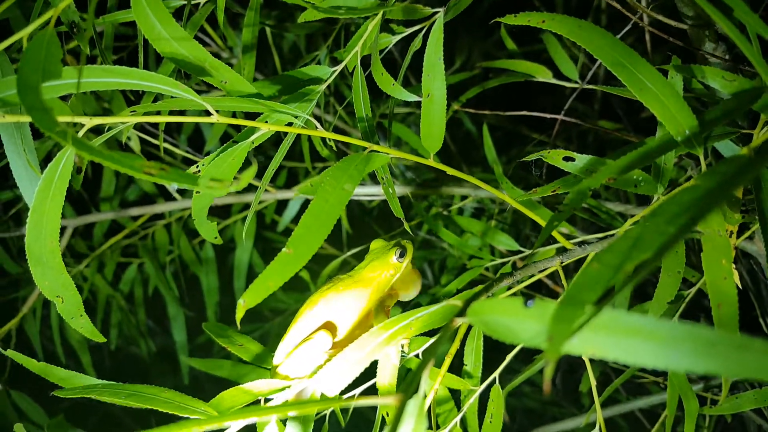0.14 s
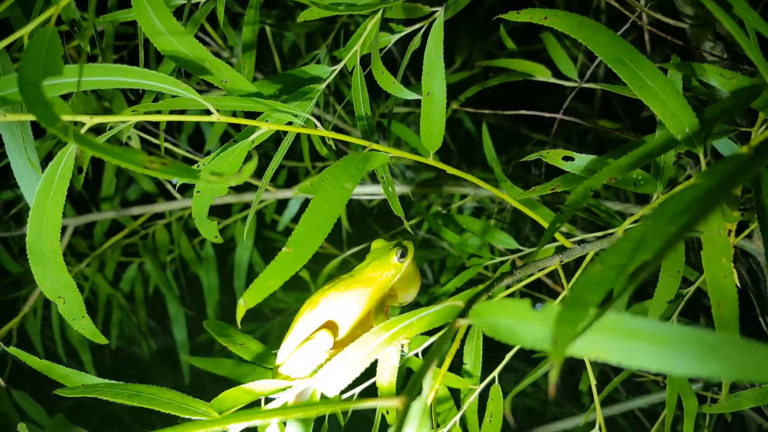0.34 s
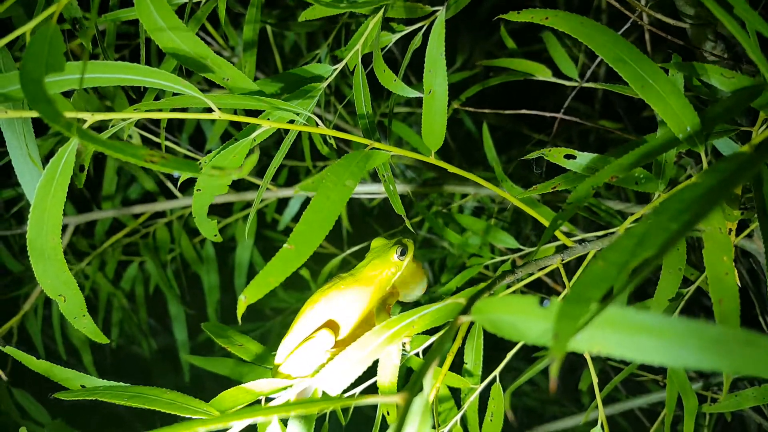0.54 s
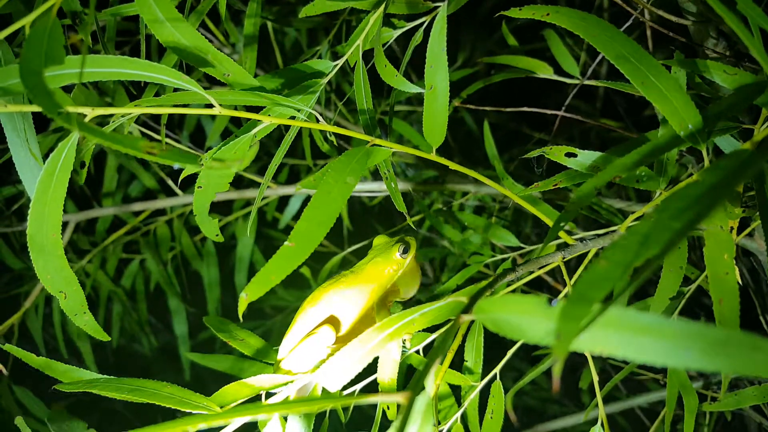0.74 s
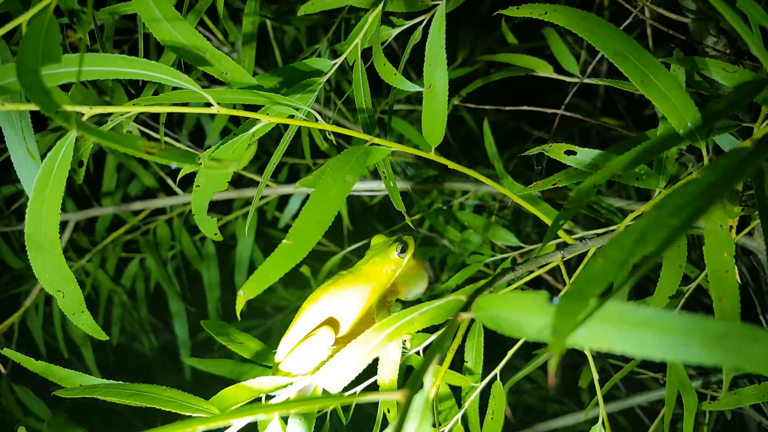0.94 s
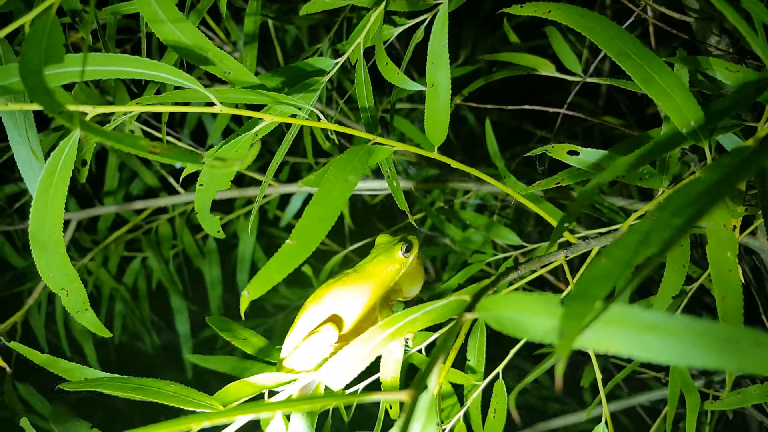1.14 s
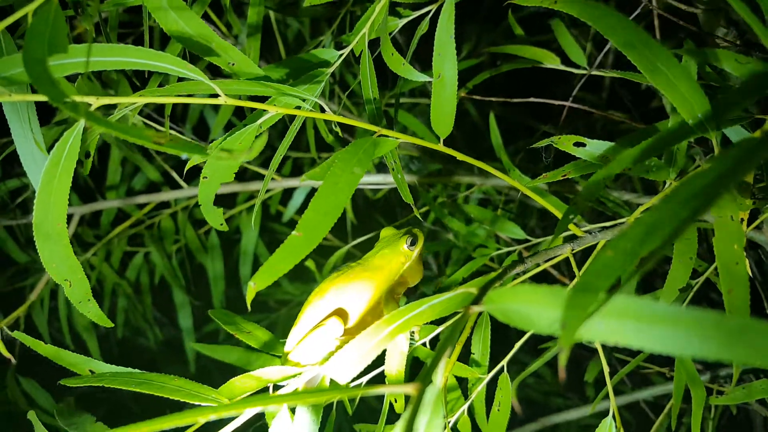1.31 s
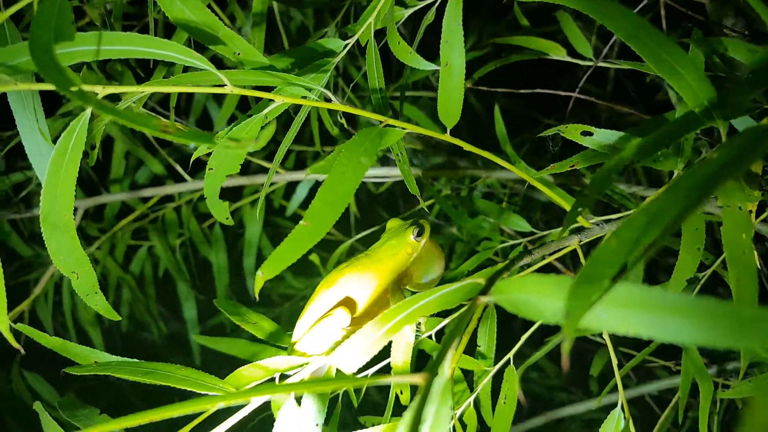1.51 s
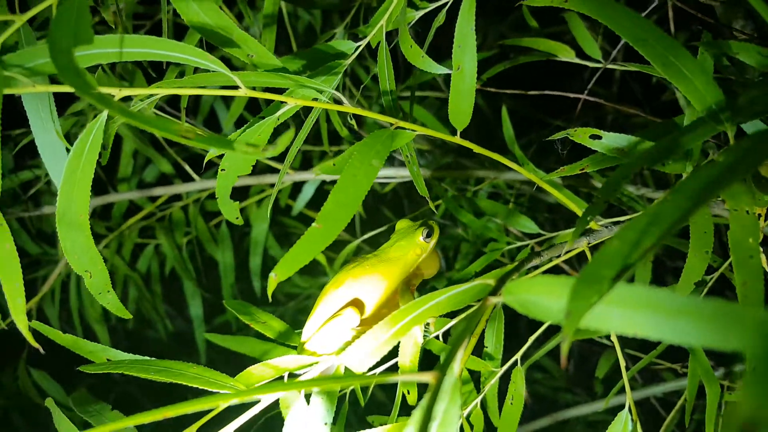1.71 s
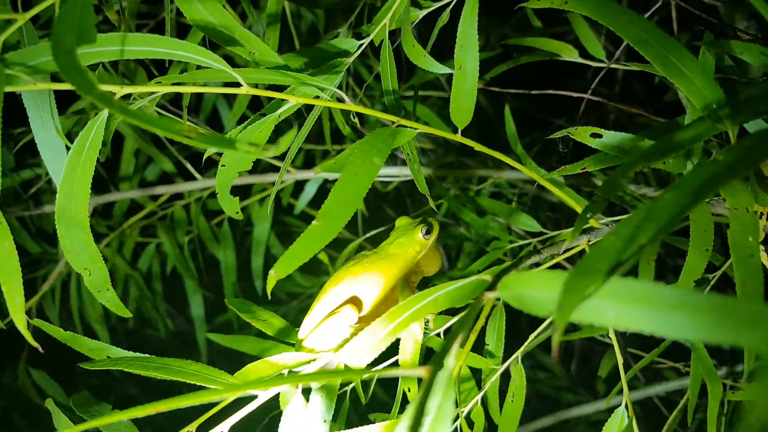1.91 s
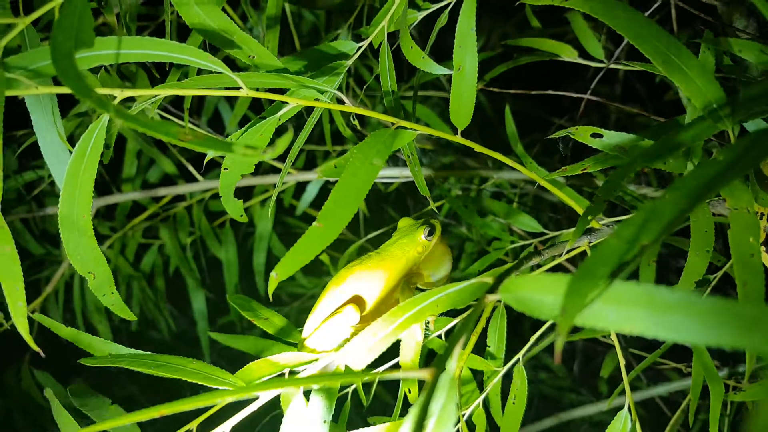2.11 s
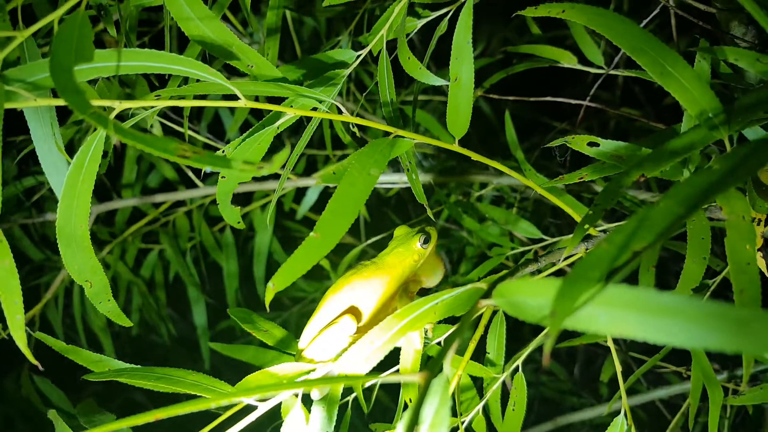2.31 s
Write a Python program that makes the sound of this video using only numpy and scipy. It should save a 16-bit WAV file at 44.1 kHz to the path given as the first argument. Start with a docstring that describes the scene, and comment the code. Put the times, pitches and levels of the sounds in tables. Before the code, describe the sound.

Five raspy, ratcheting tree frog croaks at close range, with distant frogs and insects faint behind

```python
"""A far frog sounds over a night chorus, then a tree frog croaks five times close by. Its vocal folds slap on
whole cycles of the sac's hum: slowly at first, then every second or third cycle, at last evenly every third.
Each slap rings the throat (decaying sines) and lets out a rasp of air (noise); each croak ends in a sagging hum.
Far frogs, made the same way, answer through scattering leaves; there is one dry click, insects chirp as pulsed
noise, and flickering noise bands make the insect and frog chorus and the low night rumble."""
import sys
import numpy as np
from scipy import signal
from scipy.fft import rfft, irfft
from scipy.io import wavfile

SR = 44100
rng = np.random.default_rng(int(sys.argv[2]) if len(sys.argv) > 2 else 0)


def level_to_linear(level):
    """Convert decibel levels to linear amplitude factors, elementwise."""
    exponent = np.asarray(level, float) / 20
    return 10 ** exponent


def digitize_waveform(pressure):
    """Quantize a signal to 16-bit integers and store it at the path in sys.argv[1].

    Rows of a 2-D input are taken as channels; values are limited to [-1, 1].
    """
    field = np.atleast_2d(pressure).T
    bounded = np.clip(field, -1, 1)
    quanta = np.round(bounded * 32767).astype(np.int16)
    wavfile.write(sys.argv[1], SR, quanta)


N = 103635  # length [samples]

# Close croaks: (start [s], slaps quick [s], slaps even [s], last slap [s], level [dB])
NEAR_CROAKS = [(0.2162, 0.246, .288, .3155, -7.5), (0.6066, 0.64, .6864, .7071, -7.5),
               (1.0047, 1.045, 1.0856, 1.1098, -7.5), (1.4127, 1.447, 1.4913, 1.5154, -8),
               (2.0008, 2.023, 2.0652, 2.079, -8)]
# Colour of the air rasp: (frequency [Hz], relative density [dB per Hz])
RASP_COLOUR = [(500, -38), (1000, -7), (1700, -4.5), (2600, 1.5), (3600, -12.5), (5000, -15.5),
               (6700, -11.5), (7600, -27), (11000, -43.5), (14000, -33.5), (16000, -47)]
# Mouth colour of the near frog's voice: (frequency [Hz], gain [dB])
MOUTH_COLOUR = [(500, 0.5), (1000, 2), (1600, 1.5), (2600, -1), (4000, 0), (7000, -0.5), (8000, -13.5),
                (11000, -17.5), (13000, -1.5), (16000, -5)]
# Balance of the near frog: (frequency [Hz], left over right [dB])
FROG_BALANCE = [(500, 6), (900, 8.5), (1400, 13), (2600, 8), (4400, 8), (6500, 23), (9000, 28),
                (14000, -2.5)]
# Phase between the microphones: (frequency [Hz], lead of the left [radians])
FROG_PHASE_LEAD = [(400, 2.1), (900, 1.285), (2670, 1.23), (4400, 2.1), (6500, 6.8), (14000, 28)]
BREATH_DB, LOW_CUT_HZ = -11, 690
LEAVES_DB, LEAVES_T60_S = -16.5, 0.057  # scatter off the nearby leaves


def near_frog():
    """Five croaks with a little rasp, reaching the two microphones unequally in level and phase."""
    voice, breath = np.sum([croak(*row) for row in NEAR_CROAKS], axis=0)
    rasp = coloured(breath * rng.standard_normal(N), RASP_COLOUR)
    voice = coloured(voice + level_to_linear(BREATH_DB) * rasp, MOUTH_COLOUR)
    low_cut = signal.butter(4, LOW_CUT_HZ, "high", fs=SR, output="sos")
    voice = signal.sosfilt(low_cut, voice)
    voice = voice + level_to_linear(LEAVES_DB) * scatter(voice, LEAVES_T60_S, channels=1)[0]
    hz = np.fft.rfftfreq(N, 1 / SR)
    path = level_to_linear(-at_hz(FROG_BALANCE, hz)) * np.exp(-1j * at_hz(FROG_PHASE_LEAD, hz))
    right = irfft(rfft(voice) * path, N)
    return np.array([voice, right])


# Slap strength through a croak: (time after start [s], level [dB])
SLAP_SWELL = [(0, -23), (.007, -5.5), (.014, 5), (.022, 5), (.032, 5)]
SAG_DB, EARLY_LOSS_DB = -4.5, -0.5  # fall from even to last slap; loss of a slap that comes early
CALM_DB = -9  # even slaps are steadier and carry less rasp
HUM_DB, HUM_FADE_DB = -18.5, -7


def croak(start, quick, even, last, db, tune=1.0, dull_db=0):
    """Hum, slaps locked to its cycles, and the throat ringing at each slap; returns sound and air puffs."""
    t = np.arange(N) / SR
    cycles = hum_cycles(t, start, quick, even, last, tune)
    slaps, when = slap_times(t, cycles, start, quick, even, last)
    calm_db = CALM_DB * (slaps > 0)
    effort_db = db + np.interp(t - start, *np.transpose(SLAP_SWELL)) + np.interp(t, [even, last], [0, SAG_DB])
    early = np.diff(slaps, prepend=-1e3) < EVEN_CYCLES
    slap_db = np.interp(when, t, effort_db) + EARLY_LOSS_DB * early

    gate = np.clip((t - start) / 0.0033, 0, 1) * np.clip((last + .007 - t) / 0.0013, 0, 1)
    hum_db = effort_db + HUM_DB + np.interp(t, [quick, last], [0, HUM_FADE_DB])
    hum = gate * level_to_linear(hum_db) * -np.sin(2 * np.pi * cycles)

    when = np.maximum(when, 0)
    at = (when * SR).astype(int)[:, None] + np.arange(1500)[None]  # samples that follow each slap
    age = np.maximum(at / SR - when[:, None], 0)
    rings = throat_rings(when, age, slap_db, calm_db, start, quick, even, tune, dull_db)
    puffs = air_puffs(age, slap_db, calm_db)
    ringing, breath = [np.bincount(at.ravel(), x.ravel(), N + 9000)[:N] for x in (rings, puffs)]
    return hum + sigh(t, last, db, tune) + ringing, breath


# Hum of the sac at the start, when quick, midway to even, when even, and at the last slap: (frequency [Hz])
SAC_HUM_HZ = [858, 884, 893, 880, 870]


def hum_cycles(t, start, quick, even, last, tune):
    """The sac's gliding pitch, summed into cycles and counted from the first even slap."""
    hz = tune * np.interp(t, [start, quick, (quick + even) / 2, even, last], SAC_HUM_HZ)
    cycles = np.cumsum(hz) / SR
    return cycles - np.interp(even, t, cycles)


# hum cycles between slaps: at the start, when quick, just before even, when even
SLOW_CYCLES, QUICK_CYCLES, RUSH_CYCLES, EVEN_CYCLES = 6.1, 2.9, 2.2, 3
SLOW_S, WOBBLE_CYCLES, JITTER_S = .012, .3, .00003


def slap_times(t, cycles, start, quick, even, last):
    """The folds lock to the hum: a wandering wish is rounded to whole cycles, then slaps come evenly."""
    wish, early_slaps = np.interp(start, t, cycles), []
    stages = [start, start + SLOW_S, quick, even]
    gaps = [SLOW_CYCLES, SLOW_CYCLES, QUICK_CYCLES, RUSH_CYCLES]
    while wish < -1.5:
        early_slaps.append(np.round(wish))
        now = np.interp(wish, cycles, t)
        wish += np.interp(now, stages, gaps) + WOBBLE_CYCLES * rng.standard_normal()
    even_slaps = np.arange(0, np.interp(last, t, cycles) + EVEN_CYCLES / 2, EVEN_CYCLES)
    slaps = np.r_[early_slaps, even_slaps]
    jitter = JITTER_S * rng.standard_normal(len(slaps)) * level_to_linear(CALM_DB * (slaps > 0))
    return slaps, np.interp(slaps, cycles, t) + jitter


# Throat resonances: (start [Hz], quick [Hz], open [Hz], start [dB], quick [dB], open [dB])
THROAT_RINGS = [(860, 885, 872, -12, -12, -16.5), (990, 1176, 1153, -3, -16.5, -18),
                (1480, 1800, 1710, -17, -21, -17.5), (1785, 2120, 2400, -4, -6, -7),
                (1970, 2560, 2860, -5.5, 0, 0), (3300, 4300, 3550, -19, -25.5, -35.5),
                (4600, 2600, 4400, -33, -16, -27), (5800, 9300, 6100, -40, -28.5, -28),
                (6890, 6900, 6700, -34, -18, -20), (8800, 13000, 8600, -60.5, -43.5, -31.5),
                (12880, 15000, 14000, -72, -52, -39), (14300, 18000, 14200, -67, -51.5, -31)]
# Decay of each resonance: (time to fall 60 dB [s])
RING_T60_S = [.03, .016, .012, .011, .013, .008, .007, .014, .014, .012, .008, .008]
# Swing of each resonance: (polarity [+1 or -1])
RING_SENSE = [1, 1, -1, 1, -1, 1, -1, 1, -1, 1, 1, -1]
OPEN_SHARE = .7  # the throat is fully open this far from quick to even
RING_SPREAD, SLAP_SPREAD_DB = .015, 1.2  # chance in ring pitch [share] and level
SOFT_RISE_S, RING_RISE_S, RING_STOP_S = 0.00056, .00015, .0005  # build-up at start, when quick; choking


def throat_rings(when, age, slap_db, calm_db, start, quick, even, tune, dull_db):
    """Each slap strikes the opening throat's decaying resonances, which the next slap chokes."""
    mouth = [start, quick, quick + OPEN_SHARE * (even - quick)]
    rings = 0
    for k, ((hz0, hz1, hz2, *levels_db), t60) in enumerate(zip(THROAT_RINGS, RING_T60_S)):
        pitch_luck, level_luck = rng.standard_normal((2, len(when))) * level_to_linear(calm_db)
        hz = tune * np.interp(when, mouth, [hz0, hz1, hz2])
        hz = hz * (1 + RING_SPREAD * (k > 0) * pitch_luck)  # the lowest ring keeps its pitch
        ring_db = slap_db + np.interp(when, mouth, levels_db) + SLAP_SPREAD_DB * level_luck
        size = level_to_linear(ring_db + dull_db * np.log2(hz0 / SAC_HUM_HZ[0]))
        swing = level_to_linear(-60 * age / t60) * np.sin(2 * np.pi * hz[:, None] * age)
        rings = rings - RING_SENSE[k] * size[:, None] * swing
    rise_s = np.interp(when, [start, quick], [SOFT_RISE_S, RING_RISE_S])[:, None]
    past_next = np.maximum(age - np.diff(when, append=1e3)[:, None], 0)
    return rings * (1 - np.exp(-age / rise_s)) * np.exp(-past_next / RING_STOP_S)


def air_puffs(age, slap_db, calm_db):
    """Strength of the air released by each slap, falling 60 dB in 21 ms."""
    return level_to_linear((slap_db + calm_db)[:, None] - 60 * age / 0.021)


# Overtones of the dying hum: (multiple of the pitch [ratio], level [dB])
SIGH_OVERTONES = [(1, -22.5), (2, -25), (3, -33.5), (4, -25)]
SIGH_FROM_HZ, SIGH_TO_HZ, SIGH_S, SIGH_RASP = 810, 747, .016, 0.45


def sigh(t, last, db, tune):
    """After the last slap a shaky hum with overtones swells briefly, sags in pitch and dies."""
    gone = np.clip((t - last) / SIGH_S, 0, 1)
    turns = 2 * np.pi * np.cumsum(tune * (SIGH_FROM_HZ + (SIGH_TO_HZ - SIGH_FROM_HZ) * gone)) / SR
    shake = 1 + SIGH_RASP * np.interp(t, last + np.arange(80) / 500, rng.standard_normal(80))
    tone = sum(level_to_linear(d) * np.sin(k * turns) for k, d in SIGH_OVERTONES)
    return level_to_linear(db) * shake * np.sin(np.pi * gone ** 0.93) * tone


# Far croaks: (start [s], length [s], hum when even [Hz], level before scattering [dB])
DISTANT_CROAKS = [(0.0, 0.069, 866, -49.5), (.34, 0.094, 899, -47.5), (.5, .09, 800, -58),
                  (.74, 0.084, 860, -44.5), (1.13, 0.048, 797, -45), (1.21, 0.092, 860, -45),
                  (1.67, 0.075, 853, -45), (1.85, .13, 826, -48.5), (2.2, .11, 858, -43),
                  (2.29, .06, 789, -48.5)]
FAR_QUICK, FAR_EVEN = .3, .5  # shares of the length at which slaps turn quick and even
FAR_T60_S, FAR_PAN_DB, FAR_DULL_DB = 0.099, 13.5, -6  # dulling is per octave


def far_frogs():
    """The same kind of croak from afar, smeared by scattering in the leaves."""
    voice = np.zeros(N)
    for start, length, hz, db in DISTANT_CROAKS:
        quick, even = start + FAR_QUICK * length, start + FAR_EVEN * length
        voice += croak(start, quick, even, start + length, db, hz / SAC_HUM_HZ[3], FAR_DULL_DB)[0]
    return scatter(voice, FAR_T60_S, channels=2) * level_to_linear([[0], [-FAR_PAN_DB]])


CLICK_S, CLICK_DB, CLICK_CUT_HZ, CLICK_PAN_DB = 2.0234, -4.5, 1030, 18.5


def click():
    """A single dry click: a one-sided pulse that dies through a one-pole low-pass."""
    pulse, r = np.zeros(N), np.exp(-2 * np.pi * CLICK_CUT_HZ / SR)
    pulse[int(CLICK_S * SR)] = -level_to_linear(CLICK_DB)
    return signal.lfilter([1], [1, -r], pulse) * level_to_linear([[0], [-CLICK_PAN_DB]])


# Insect chirps: (start [s], length [s], level on the left [dB])
INSECT_CHIRPS = [(0.064, 0.083, -68), (0.357, 0.07, -68), (0.824, 0.084, -69.5), (1.267, 0.095, -69),
                 (1.667, 0.056, -67.5), (1.977, 0.062, -71), (2.183, 0.072, -68)]
CHIRP_LOW_HZ, CHIRP_HIGH_HZ, CHIRP_PULSES_PER_S, CHIRP_PAN_DB = 8000, 9300, 250, 16


def chirps():
    """Insects chirp in short pulsed bursts of high band-passed hiss."""
    t = np.arange(N) / SR
    shape = sum(level_to_linear(db) * np.sin(np.pi * np.clip((t - s) / d, 0, 1)) ** .5 for s, d, db in INSECT_CHIRPS)
    band = signal.butter(3, [CHIRP_LOW_HZ, CHIRP_HIGH_HZ], "band", fs=SR, output="sos")
    hiss = rms_one(signal.sosfilt(band, rng.standard_normal((2, N))))
    pulses = 1 + .5 * np.sin(2 * np.pi * CHIRP_PULSES_PER_S * t)
    return shape * hiss * pulses * level_to_linear([[0], [-CHIRP_PAN_DB]])


# Colour of the night chorus: (frequency [Hz], relative density [dB per Hz])
NIGHT_COLOUR = [(12, -36.5), (20, -12), (65, -3.5), (179, -6), (244, -5.5), (393, -13.5), (465, -14),
                (566, -15.5), (634, -19.5), (816, -3), (888, -6.5), (966, -13.5), (1050, -12.5),
                (1560, -22.5), (2810, -5), (3330, -1), (3830, -10.5), (4160, -16), (5070, -22),
                (5830, -23.5), (6710, -4), (8170, -37), (10500, -37.5), (15200, -24), (16500, -40)]
# Lift added to that colour, strongest in the rumble: (frequency [Hz], gain [dB])
RUMBLE_LIFT = [(20, 6.5), (130, 9), (300, 0), (600, 3.5)]
# Balance of the night: (frequency [Hz], left over right [dB])
NIGHT_BALANCE = [(60, 0.5), (110, -0.5), (200, 3), (380, -0.5), (700, 6.0), (1290, 4), (2380, 10.5),
                 (4400, 14.5), (8120, 29), (15000, -4)]
# Left-right likeness of the night: (frequency [Hz], correlation [-1 to 1])
NIGHT_LIKENESS = [(60, 0.91), (130, 0.87), (290, 0.39), (640, 0.077), (1410, -0.19), (3100, -0.18),
                  (6820, 0.84), (15000, -0.35)]
NIGHT_DB = -54


def night(patchy_db):
    """Insect and frog chorus with rumble: noise bands with own flicker, balance and likeness."""
    mid, side = rfft(rng.standard_normal((2, N)))
    hz = np.fft.rfftfreq(N, 1 / SR)
    alike = np.clip(at_hz(NIGHT_LIKENESS, hz), -1, 1)
    tone = level_to_linear(at_hz(NIGHT_COLOUR, hz) + at_hz(RUMBLE_LIFT, hz))
    pair = tone * (np.sqrt(1 + alike) * mid + np.sqrt(1 - alike) * side * [[1], [-1]])
    pair = pair * level_to_linear(at_hz(NIGHT_BALANCE, hz) * [[0], [-1]])
    place = 2 * np.log2(np.maximum(hz, 20) / 20)  # half octaves above 20 Hz
    total = 0
    for k in range(21):
        band = irfft(pair * np.clip(1 - abs(place - k), 0, 1), N)
        total = total + band * level_to_linear(patchy_db * drift(12.2))
    return level_to_linear(NIGHT_DB) * rms_one(total)


# Colour of the microphone hiss: (frequency [Hz], relative density [dB per Hz])
HISS_COLOUR = [(300, 0), (4000, 2), (9000, -8.5), (14000, -3), (16000, -8.5)]
# Hiss of the left, then the right microphone: (level [dB])
HISS_LEVEL_DB = [
    [-80],
    [-73],
]


def microphone_hiss():
    """Steady coloured noise, independent in each microphone."""
    return level_to_linear(HISS_LEVEL_DB) * rms_one(coloured(rng.standard_normal((2, N)), HISS_COLOUR))


def scatter(x, t60, channels):
    """Smear through a dying noise tail of unit energy."""
    tail = rng.standard_normal((channels, 9000)) * level_to_linear(-60 * np.arange(9000) / SR / t60)
    tail = tail / np.sqrt(np.sum(tail ** 2, axis=1, keepdims=True))
    return signal.fftconvolve(x[None], tail, axes=1)[:, :N]


def coloured(x, spectrum):
    """Give a signal a spectrum."""
    return irfft(rfft(x) * level_to_linear(at_hz(spectrum, np.fft.rfftfreq(N, 1 / SR))), N)


def at_hz(points, hz):
    """Read a table on a log-frequency axis."""
    p = np.array(points, float)
    return np.interp(np.log(hz + 1), np.log(p[:, 0] + 1), p[:, 1])


def drift(rate):
    """Slow random wander of spread 1: noise through two poles at rate [Hz], run at SR / 40."""
    r = np.exp(-80 * np.pi * rate / SR)
    slow = signal.lfilter([1], [1, -2 * r, r * r], rng.standard_normal(N // 40 + 2002))[2000:]
    return np.interp(np.arange(N) / 40, np.arange(len(slow)), rms_one(slow))


def rms_one(x):
    """Scale to rms 1."""
    return x / np.sqrt(np.mean(x ** 2) + 1e-20)


def scene():
    """Near frog, far frogs, click, chirps and night sum in the air."""
    return near_frog() + far_frogs() + click() + chirps() + night(patchy_db=1.3)


def band_limit(x):
    """A steep low-pass at the top of the band."""
    return signal.sosfilt(signal.butter(12, 16840, fs=SR, output="sos"), x)


def record(dry):
    """Microphone hiss joins, then peaks are rounded and stop at full scale."""
    wet = dry + microphone_hiss()
    rounded = 2.3 * np.tanh(wet / 2.3)
    return band_limit(np.clip(rounded, -1, 1))


dry = scene()
out = record(dry)
digitize_waveform(out)
```